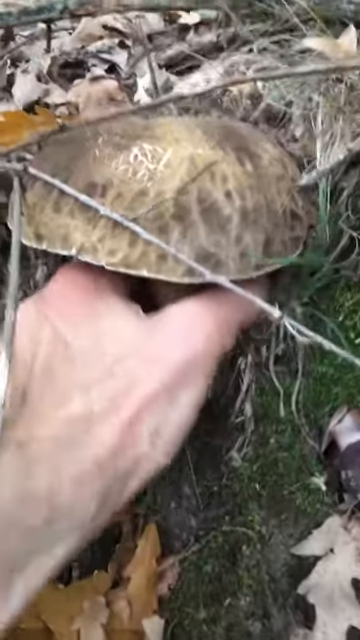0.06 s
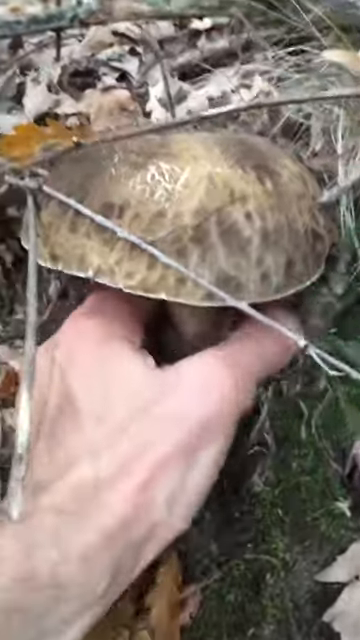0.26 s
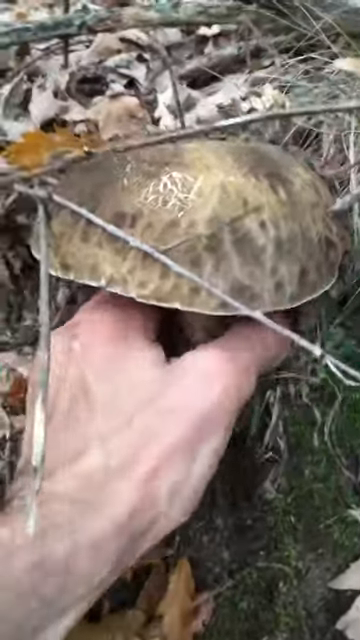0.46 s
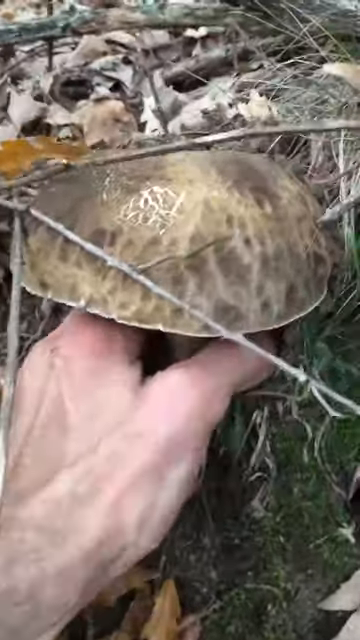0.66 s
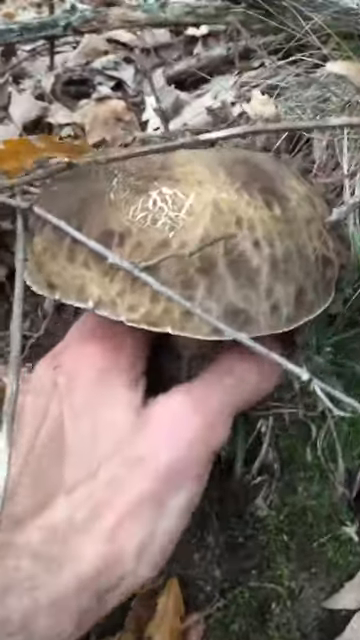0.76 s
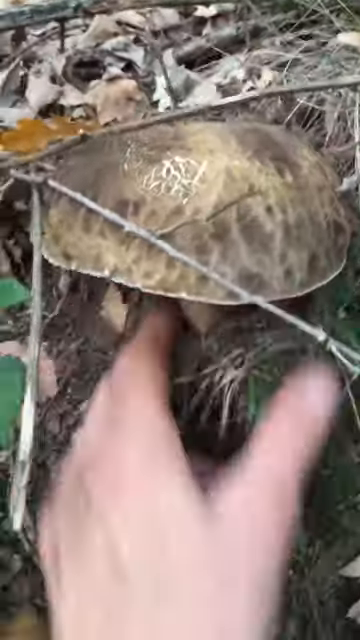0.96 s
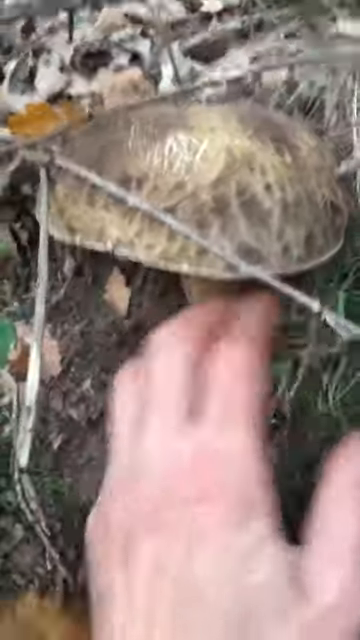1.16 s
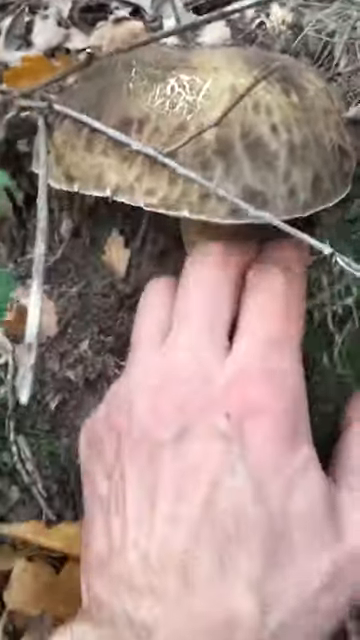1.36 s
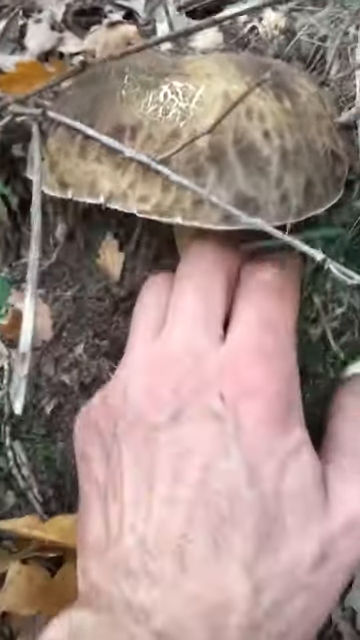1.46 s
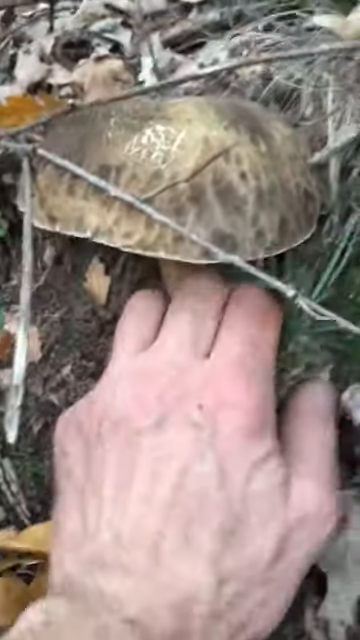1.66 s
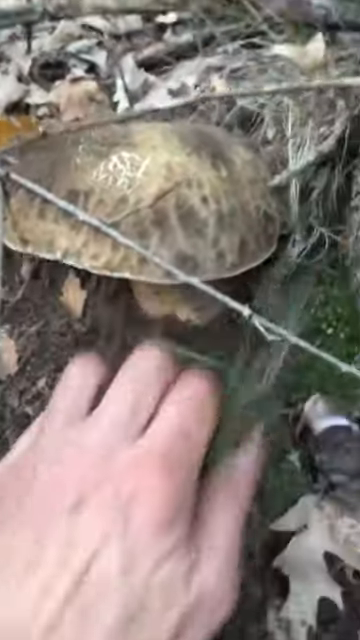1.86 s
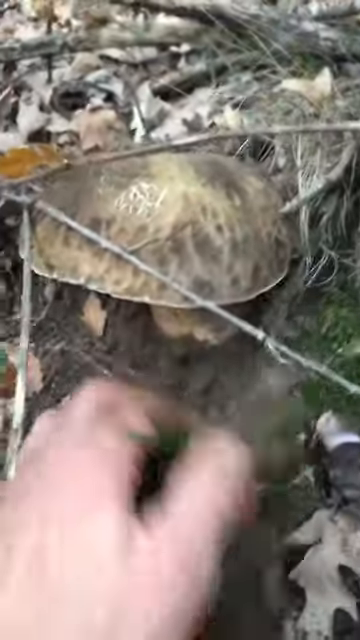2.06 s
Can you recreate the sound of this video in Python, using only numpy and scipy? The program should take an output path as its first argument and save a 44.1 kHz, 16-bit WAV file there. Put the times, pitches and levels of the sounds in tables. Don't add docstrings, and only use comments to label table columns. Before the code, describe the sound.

Crisp leaf rustling and sharp little snaps, close up, as fingers work around a mushroom stem

```python
import sys
import numpy as np
from scipy import signal
from scipy.io import wavfile
from scipy.ndimage import uniform_filter1d

SR = 44100
rng = np.random.default_rng(int(sys.argv[2]) if len(sys.argv) > 2 else 0)


def attenuation_scalar(level_db):
    decades = np.asarray(level_db, float) / 20
    return 10 ** decades


def persist_wave(psi):
    counts = np.round(np.clip(psi, -1, 1) * 32767).astype(np.int16)
    wavfile.write(sys.argv[1], SR, np.atleast_2d(counts).T)


N = 92786


def evened(x):
    return x / np.sqrt(np.mean(x ** 2) + 1e-20)


def smoothed(x, size, axis=-1):
    return uniform_filter1d(x, size, axis=axis)


def add(mix, start_s, sound):
    part = mix[round(start_s * SR):][:len(sound)]
    part += sound[:len(part)]


def colour(x, spectrum):
    hz, level_db = np.transpose(spectrum)
    bin_hz = abs(np.fft.fftfreq(4096, 1 / SR))
    log_gain = np.log(attenuation_scalar(np.interp(np.log(bin_hz + 1), np.log(hz + 1), level_db)))
    taps = np.fft.ifft(np.exp(log_gain - 1j * signal.hilbert(log_gain).imag)).real[:2048]
    return signal.oaconvolve(x, taps)[:N]


def resonance(x, hz, width_hz):
    return signal.lfilter(*signal.iirpeak(hz, hz / width_hz, SR), x)


def band(x, low_hz, high_hz):
    return signal.lfilter(*signal.butter(2, [low_hz, high_hz], "band", fs=SR), x)


def wander(period_s):
    width = max(round(period_s * SR), 2)
    return evened(smoothed(smoothed(rng.standard_normal(N), width), width))


def sparse(per_s, size_db):
    draw = rng.random((N, 3))
    size = attenuation_scalar(size_db * np.minimum(-np.log(draw[:, 0] + 1e-9), 4))
    return size * np.sign(draw[:, 1] - .5) * (draw[:, 2] < per_s / SR)


def pressure(strokes):
    rise_s, release_s = .009, .012
    start_s, length_s, level_db = np.array(strokes).T[:3, :, None]
    t = np.arange(N) / SR - start_s
    release = np.exp(-np.maximum(t - length_s, 0) / release_s)
    return (attenuation_scalar(level_db) * np.clip(t / rise_s, 0, 1) * release) ** 2


def crackling(clicks):
    cycles = 3.5
    which, t, crackle = rng.integers(0, 24, N), np.arange(256) / SR, np.zeros(N)
    modes_hz, phases = np.exp(rng.uniform(7.2, 9.6, (24, 3))), rng.random((24, 3))
    for k, (hz, turn) in enumerate(zip(modes_hz, phases)):
        turns = np.outer(t, hz)
        ring = np.sqrt(hz) * np.exp(-turns / cycles) * np.sin(2 * np.pi * (turns + turn))
        crackle += signal.oaconvolve(clicks * (which == k), evened(ring.sum(1)))[:N]
    return crackle


# start_s, length_s, level_db, bright_db_per_octave
GRIP_STROKES = [(0, 0.011, -51.5, -5), (.11, 0.027, -60.5, -3), (.2, 0.042, -53.5, -2),
                (.235, 0.031, -46, -1), (.258, 0.014, -46.5, -6), (.283, 0.017, -43, -3),
                (.322, 0.013, -61, -8), (.347, 0.047, -59.5, 0), (.41, 0.004, -48, -3),
                (.44, 0.01, -47, -6), (.485, 0.015, -55, -5.5), (.502, 0.011, -52.5, -5.5),
                (.535, 0.04, -57, -7.5), (.628, 0.024, -56.5, -6)]
PULL_STROKES = [(.782, 0.034, -54.5, -6.5), (0.822, 0.067, -50, -6.5), (0.906, 0.031, -44, -3.5),
                (0.95, .044, -44, -1), (0.995, 0.043, -39, -1.8), (1.043, 0.015, -38, -3.5),
                (1.059, 0.046, -29.5, -1.1), (1.104, 0.034, -35, 0.12), (1.164, 0.067, -43.5, -0.86),
                (1.225, 0.053, -42.5, -2.2), (1.249, 0.045, -40.5, 0), (1.303, 0.049, -38.5, -1)]
DIG_STROKES = [(1.428, 0.034, -48.5, -1), (1.452, 0.022, -45, -3), (1.485, 0.069, -51.5, -2),
               (1.553, 0.12, -53.5, -4.5), (1.617, 0.034, -48, -3), (1.676, 0.048, -46.5, -1.4),
               (1.735, 0.019, -54.5, -2.5), (1.804, 0.0059, -44, -1.8), (1.831, 0.048, -53, -6.5),
               (1.879, 0.022, -44.5, -1.5), (1.898, .045, -44.5, -2), (1.938, 0.061, -38, -1),
               (2.003, 0.032, -45, 0.5), (2.032, 0.016, -36, -0.8), (2.053, 0.076, -48.5, -1)]
# time_s, level_db
SETTLING = [
    (0, -70),
    (.72, -67),
    (.85, -52.5),
    (1.4, -53),
    (1.74, -65),
    (1.785, -59),
    (1.82, -55),
    (2.1, -57),
]
# pitch_hz, density_db
LEAF_SPECTRUM = [(88, -37), (150, -28), (254, -16.5), (790, -13.5), (1040, -12.5), (3490, -5),
                 (10400, -3.5), (14000, -6), (16000, -6)]


def leaves():
    settling_bright, clump_db, clump_s = -1.2, 1.2, .003
    crackle_db, fizz_db, patch_db = -9.5, -5.5, 1.5
    grass_hz, grass_width_hz, grass_lift, grass_until_s = 6250, 680, 0.71, 0.64
    strokes, s = GRIP_STROKES + PULL_STROKES + DIG_STROKES, np.arange(N) / SR
    power = pressure(strokes)
    settling = attenuation_scalar(np.interp(s, *np.transpose(SETTLING))) ** 2
    total = power.sum(0) + settling
    bright = (np.array(strokes)[:, -1] @ power + settling_bright * settling) / total

    busy = np.clip((total / attenuation_scalar(-38) ** 2) ** .45, 0.065, 1)
    clump = wander(clump_s)
    per_s = 2500 * busy * np.clip(1 + 0.8 * clump, .05, 4)
    crackle = crackling(sparse(per_s, size_db=3.7) / np.sqrt(busy))

    hz, at_s, z = signal.stft(crackle, SR, nperseg=256)
    z = z / np.sqrt(smoothed(np.mean(abs(z) ** 2, 1), 9))[:, None]
    fizz = signal.stft(rng.standard_normal(N), SR, nperseg=256)[2]
    fizz = fizz / np.sqrt(np.mean(abs(fizz) ** 2))
    patches = evened(smoothed(smoothed(rng.standard_normal(z.shape), 8, axis=0), 3, axis=1))
    fizz = np.interp(at_s, s, busy) ** 0.14 * attenuation_scalar(fizz_db + patch_db * patches) * fizz
    octaves = np.log2(np.clip(hz, 2500, 16000) / 5000)
    z = (attenuation_scalar(crackle_db) * z + fizz) * attenuation_scalar(np.outer(octaves, np.interp(at_s, s, bright)))
    raw = colour(signal.istft(z, SR, nperseg=256)[1][:N], LEAF_SPECTRUM)

    raw = raw + grass_lift * (s < grass_until_s) * resonance(raw, grass_hz, grass_width_hz)
    return evened(raw) * np.sqrt(total) * attenuation_scalar(clump_db * clump)


# pitch_hz, density_db
AIR_SPECTRUM = [(25, -50), (42, -1), (90, -2), (160, -12), (700, -18), (4000, -28), (16000, -41)]
# time_s, strength_db
BREEZE_GUSTS = [(.05, 2.5), (.2, -4.5), (.28, 6.5), (.34, -4), (.53, -2), (0.569, 11), (.67, -11),
                (.77, 6.5), (.82, -4.5), (1.05, -2), (1.13, -7), (1.27, 1), (1.5, 1.5), (1.55, -0.5),
                (1.72, -2), (1.84, -18), (1.98, 3.5), (2.05, -5)]


def air():
    level_db, gust_db, gust_s, rumble_hz = -63, 1.5, .04, 150
    still = evened(colour(rng.standard_normal(N), AIR_SPECTRUM))
    rumble = signal.filtfilt(*signal.butter(2, rumble_hz, fs=SR), still)
    breeze_db = np.interp(np.arange(N) / SR, *np.transpose(BREEZE_GUSTS))
    gust = attenuation_scalar(gust_db * wander(gust_s) + breeze_db)
    return attenuation_scalar(level_db) * (still + (gust - 1) * rumble)


# start_s, peak_db, pitch_hz
STEM_KNOCKS = [
    (0.012, -43, 650),
    (0.142, -52, 720),
    (0.549, -45.5, 1040),
    (0.949, -62, 330),
    (1.307, -36, 1060),
    (1.494, -42, 854),
    (1.543, -45, 483),
    (1.597, -38.5, 750),
    (1.695, -29, 740),
    (1.926, -34.5, 940),
]
# start_s, peak_db, pitch_hz
ROOT_TEARS = [
    (1.63, -40, 764),
    (1.71, -34, 707),
    (1.867, -38, 1270),
    (1.884, -43, 950),
    (1.915, -32, 1030),
    (1.935, -31, 1570),
    (1.95, -34.5, 910),
    (1.956, -24.5, 710),
    (1.966, -31, 697),
    (1.977, -42, 1600),
]


def knock(peak_db, pitch_hz):
    rise_s, t60_s = .0019, .018
    t = np.arange(0, .05, 1 / SR)
    ring = np.sin(2 * np.pi * pitch_hz * t) + .5 * np.sin(2.7 * np.pi * pitch_hz * t)
    return attenuation_scalar(peak_db - 60 * t / t60_s) * ring * np.minimum(t / rise_s, 1)


# start_s, peak_db, pitch_hz, crack_share_0_to_1
LEAF_SNAPS = [(0.0145, -36.5, 1620, 0.38), (0.1235, -42, 2930, 0.2), (0.2362, -19.5, 2345, 0.56),
              (0.2841, -25, 6560, 0.7), (0.2934, -22, 4100, 0.56), (0.3091, -21, 4060, 0.2),
              (0.3714, -35, 3470, 0.5), (0.4144, -33.5, 4670, 0.7), (0.4281, -19.5, 4100, 0.64),
              (0.445, -28.5, 6360, 0.87), (0.5375, -30, 2670, 0.6), (0.567, -42, 3060, 0.1),
              (0.632, -37, 3540, 0.45), (0.6626, -34.5, 6200, 1), (0.7145, -38.5, 3900, 0.72),
              (0.7634, -22, 4560, 0.66), (0.7837, -24.5, 5430, 0.86), (0.8268, -24, 2680, 0.82),
              (0.8993, -23, 4400, 0.8), (0.9176, -15.5, 3520, 0.69),
              (1.0675, -10.5, 8680, 0.64), (1.0783, -5.5, 6130, 0.68), (1.0978, -19, 8600, 0.42),
              (1.1184, -19, 9150, 0.45), (1.1388, -22, 8510, 0.38), (1.3077, -17.5, 4200, 0.83),
              (1.3924, -28, 9180, 1), (1.3983, -19, 6150, 0.77), (1.4565, -20, 6500, 0.76),
              (1.5458, -20.5, 8100, 0.82), (1.6075, -29, 4430, 0.52), (1.645, -27.5, 4500, 0.86),
              (1.6827, -27, 2120, 0.68), (1.719, -27, 5630, 0.53), (1.8184, -28.5, 4230, 0.2),
              (1.8664, -25.5, 2230, 0.52), (1.8793, -18, 4530, 0.92), (1.9086, -23.5, 1420, 0.69),
              (1.9935, -39, 6000, 0.63), (2.0324, -23, 5670, 0.46), (2.0417, -18.5, 5650, 0.75),
              (2.043, -27.5, 1490, 0.61),
              (0.3113, -14, 3230, 0.71),
    (0.329, -31, 3800, 0.5),
    (0.8683, -16.5, 13440, 0.64),
    (0.434, -28, 3350, 0.7),
    (1.161, -20, 3450, 0.96),
    (1.258, -36, 7960, 0.9),
    (1.543, -25.5, 6700, 0.84),
    (1.9098, -21.5, 6600, 0.75),
]
# start_s, peak_db, pitch_hz
CREASE_BREAKS = [(.093, -48, 13400), (0.205, -44, 4230), (0.219, -38, 4300), (0.335, -42, 3520),
                 (0.3493, -37, 2770), (.355, -34.5, 3270), (0.38, -41, 3560), (0.3852, -41, 3560),
                 (.4084, -43, 5000), (.4243, -42, 8800), (0.489, -39, 2750), (0.509, -41, 4200),
                 (.5286, -43, 12100), (.544, -36.5, 11000), (.5514, -42, 2140), (.58, -56, 13000),
                 (.7454, -44, 11600), (.7944, -38, 4420), (0.807, -48, 2600), (0.841, -29.5, 4030),
                 (0.8569, -32, 3800), (0.873, -35, 9100), (0.885, -41, 9000), (.891, -34, 3500),
                 (0.9107, -26, 12500), (.9485, -24, 2800), (.9553, -26, 4600), (1.0005, -27, 8330),
                 (1.034, -25.5, 4170), (1.054, -20, 8850), (1.3575, -27.5, 1780), (1.525, -34, 5250),
                 (1.5969, -40, 4600), (1.6534, -38, 3570), (1.6996, -29, 8540), (1.712, -35, 6240),
                 (1.7268, -35, 4340), (1.744, -37, 2600), (1.7687, -42, 4340), (1.8107, -35, 6600),
                 (1.8332, -35, 4340), (1.9261, -27, 1520), (1.9784, -27.5, 1630), (1.99, -35, 6040)]


def snap(peak_db, pitch_hz, crack_share):
    rise_s, ring_t60_s, crack_t60_s = .001, .009, .0045
    after_db, after_t60_s = -17, .018
    t = np.arange(0, .04, 1 / SR)
    noise = rng.standard_normal((2, len(t)))
    ring = 1.18 * np.sin(2 * np.pi * pitch_hz * t) * attenuation_scalar(-60 * t / ring_t60_s)
    crack = 1.23 * band(noise[0], min(pitch_hz * 0.71, 6000), min(pitch_hz * 4.7, 19000))
    crack = crack * attenuation_scalar(-60 * t / crack_t60_s)
    rattle = evened(band(noise[1], pitch_hz * 0.56, min(pitch_hz * 1.3, 15000)))
    rattle = rattle * attenuation_scalar(after_db - 60 * t / after_t60_s)
    sound = (1 - crack_share) * ring + crack_share * crack + rattle
    return attenuation_scalar(peak_db) * np.minimum(t / rise_s, 1) * sound


# start_s, peak_db, pitch_hz
GROUND_THUMPS = [
    (1.047, -41.5, 286),
    (1.091, -47.5, 272),
    (1.693, -43, 302),
    (1.951, -43, 286),
]


def thump(peak_db, pitch_hz):
    rise_s, t60_s, sag_per_s = .011, 0.054, 28.5
    t = np.arange(0, .08, 1 / SR)
    turns = pitch_hz * (1 - np.exp(-sag_per_s * t)) / sag_per_s
    rise = np.minimum(t / rise_s, 1) ** 2
    return 3 * attenuation_scalar(peak_db - 60 * t / t60_s) * np.sin(2 * np.pi * turns) * rise


# start_s, length_s, level_db
SOIL_SCRAPES = [
    (1.05, 0.078, -49.5),
    (1.24, 0.13, -58),
    (1.49, 0.0073, -54.5),
    (1.625, 0.021, -48.5),
    (1.693, 0.039, -50.5),
    (1.866, 0.026, -49),
    (1.908, 0.069, -45.5),
    (1.94, 0.025, -41.5),
    (1.976, 0.05, -48.5),
    (2.03, 0.03, -67),
]
# pitch_hz, density_db
SOIL_SPECTRUM = [(100, -30), (230, 5.5), (400, -2), (700, 0), (1200, 0), (2000, -2), (4000, -20)]


def soil():
    crumbs = evened(sparse(per_s=800, size_db=3.2)) + attenuation_scalar(-3) * rng.standard_normal(N)
    grain = attenuation_scalar(2.0 * wander(0.0027))
    return np.sqrt(pressure(SOIL_SCRAPES).sum(0)) * grain * evened(colour(crumbs, SOIL_SPECTRUM))


def scene():
    mix = leaves() + air() + soil()
    for start_s, *row in STEM_KNOCKS + ROOT_TEARS:
        add(mix, start_s, knock(*row))
    for start_s, *row in LEAF_SNAPS:
        add(mix, start_s, snap(*row))
    for start_s, peak_db, pitch_hz in CREASE_BREAKS:
        add(mix, start_s, snap(peak_db + 2.5, pitch_hz, crack_share=0.55))
    for start_s, *row in GROUND_THUMPS:
        add(mix, start_s, thump(*row))
    return mix[None]


# pitch_hz, width_hz, depth_0_to_1
PORT_HOLLOWS = [(5066, 265, 0.52), (10340, 1480, 0.52)]


def microphone_port(x):
    for pitch_hz, width_hz, depth in PORT_HOLLOWS:
        x = x - depth * resonance(x, pitch_hz, width_hz)
    return x


def low_pass(x):
    return signal.sosfilt(signal.butter(12, 16150, fs=SR, output="sos"), x)


def record(dry):
    band_limit = signal.firwin(1023, 15780, window=("kaiser", 9), fs=SR)
    out = signal.oaconvolve(microphone_port(dry), band_limit[None], "same")
    return low_pass(out)


dry = scene()
out = record(dry)
persist_wave(out)
```